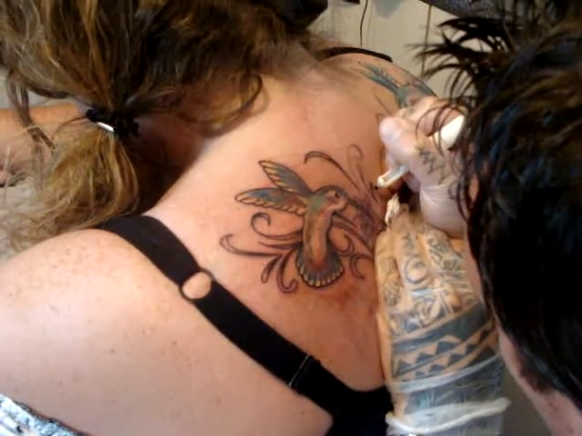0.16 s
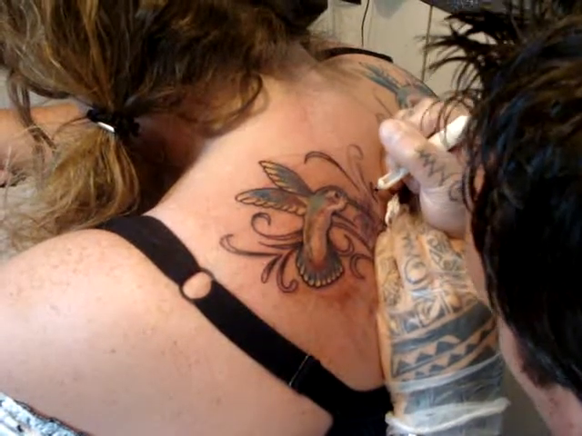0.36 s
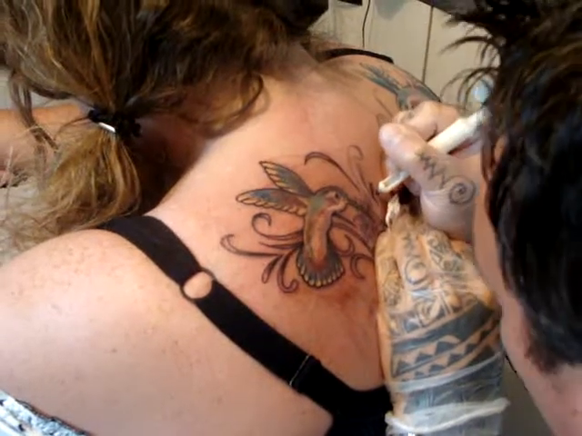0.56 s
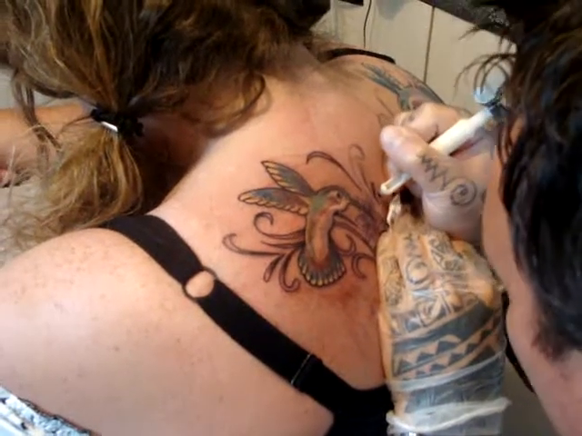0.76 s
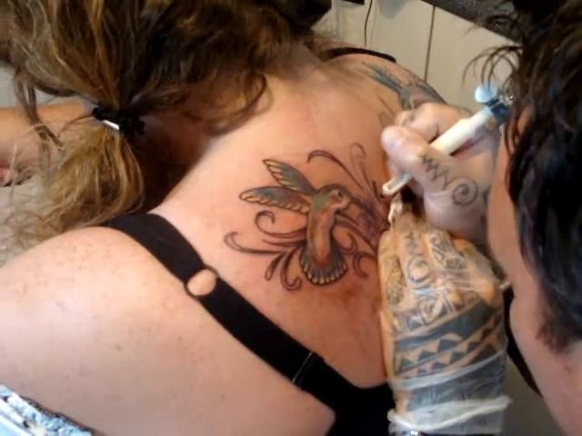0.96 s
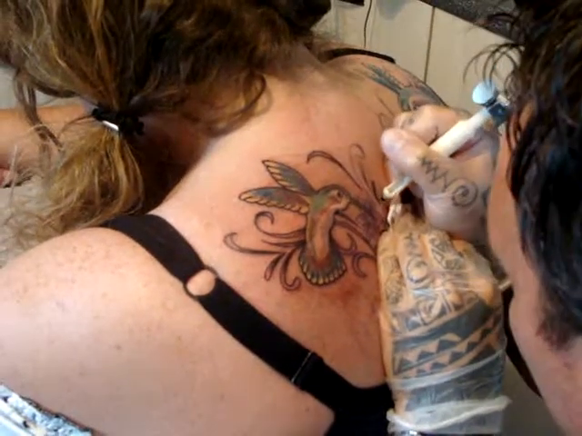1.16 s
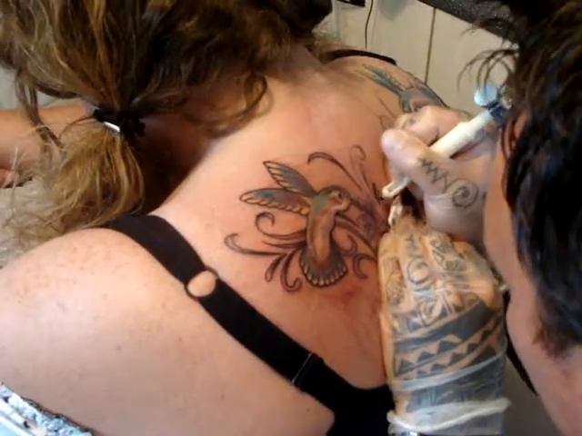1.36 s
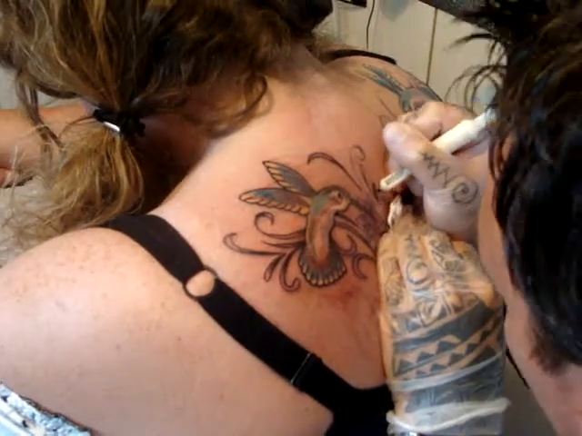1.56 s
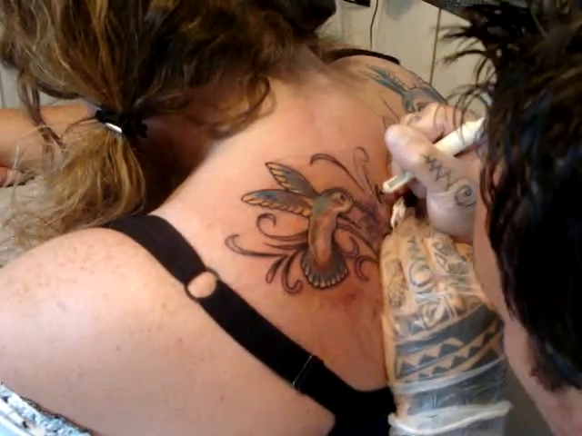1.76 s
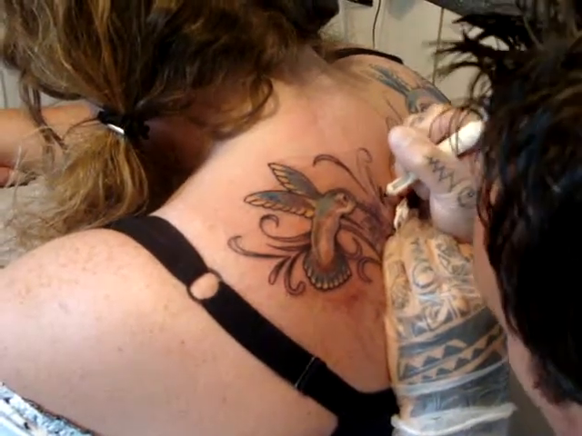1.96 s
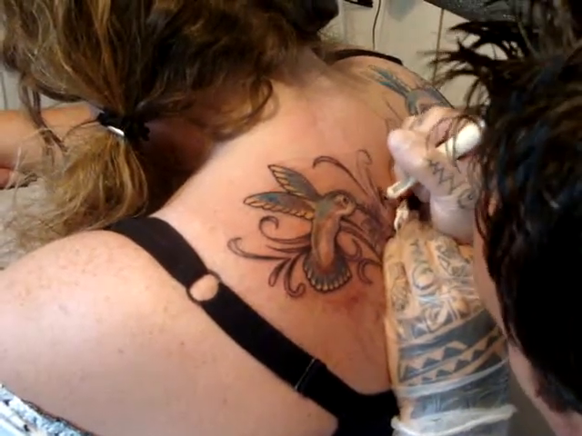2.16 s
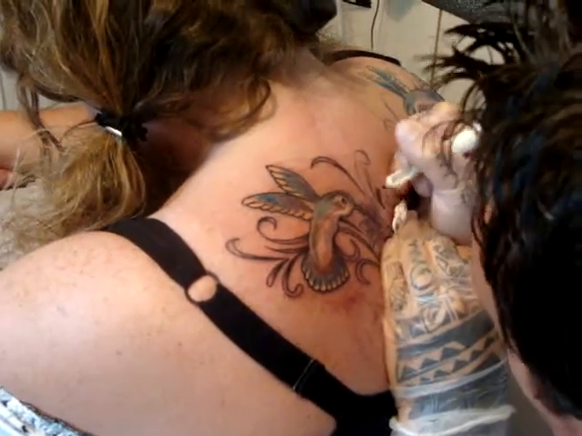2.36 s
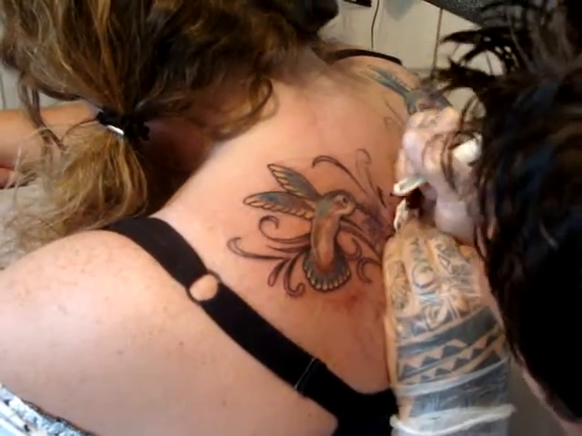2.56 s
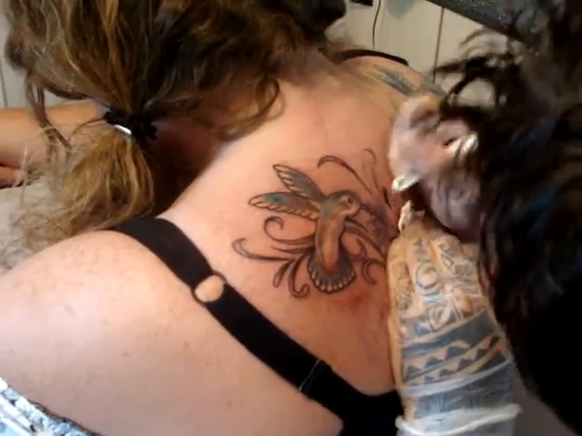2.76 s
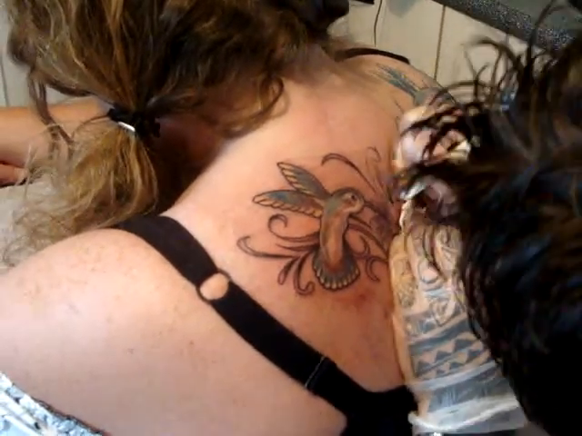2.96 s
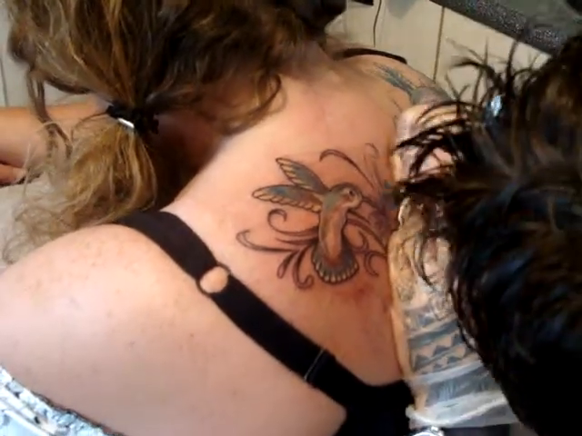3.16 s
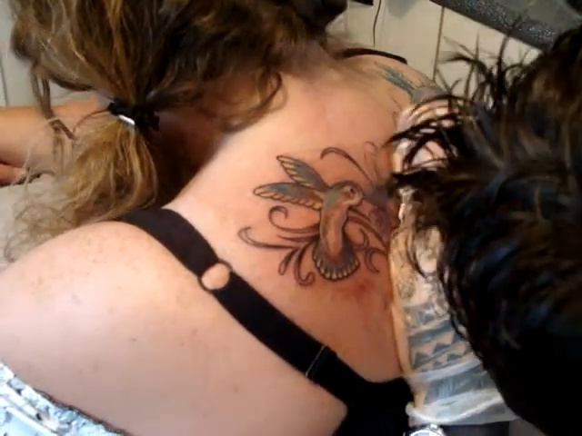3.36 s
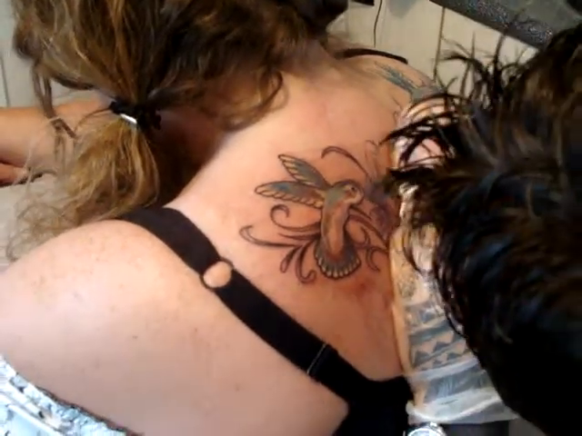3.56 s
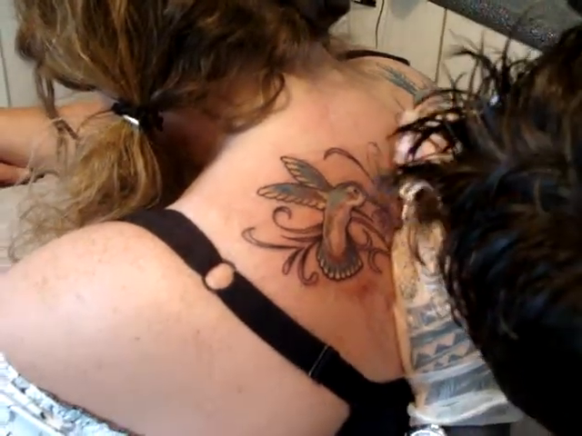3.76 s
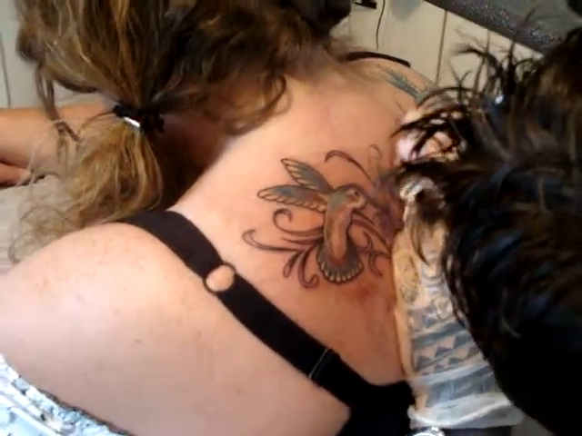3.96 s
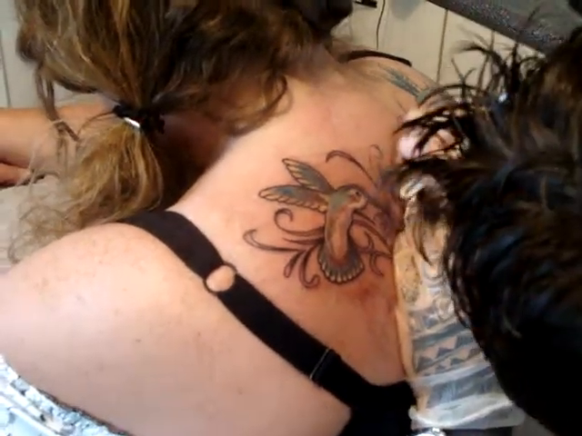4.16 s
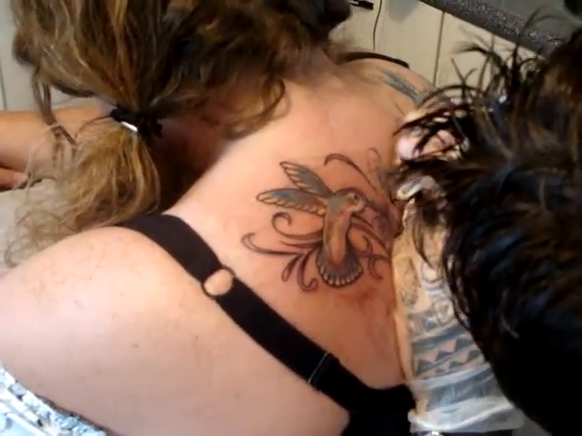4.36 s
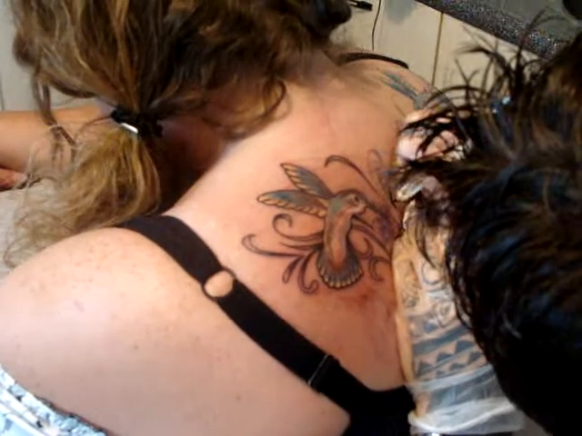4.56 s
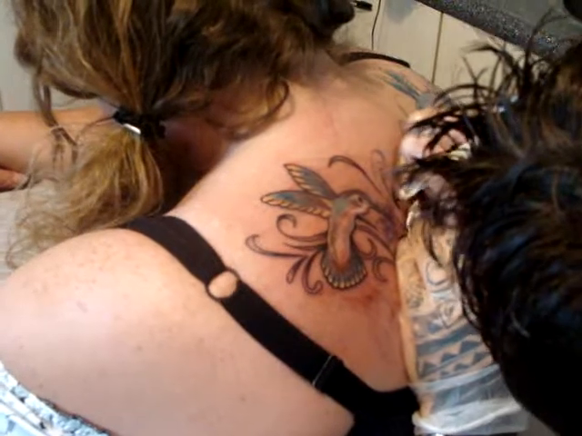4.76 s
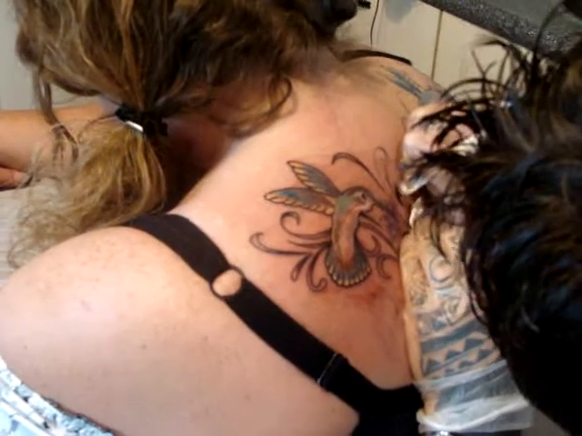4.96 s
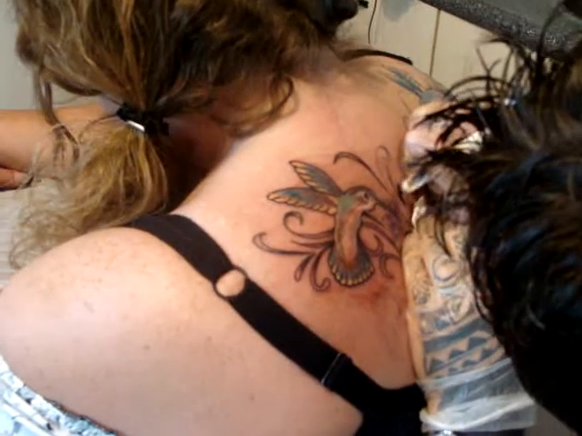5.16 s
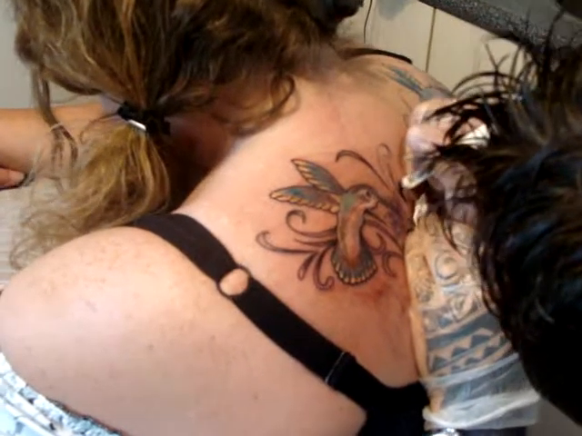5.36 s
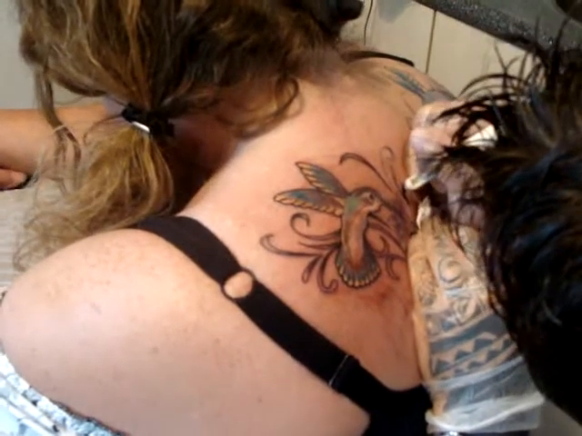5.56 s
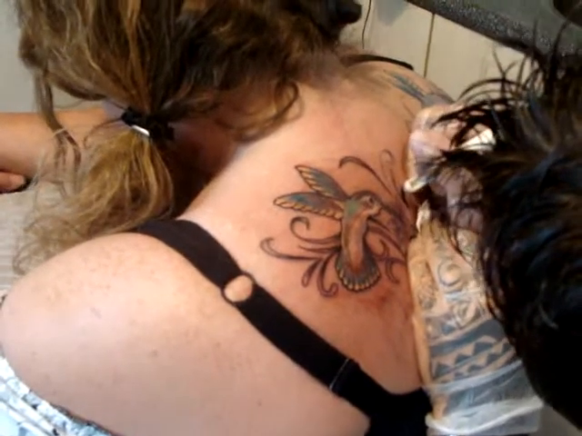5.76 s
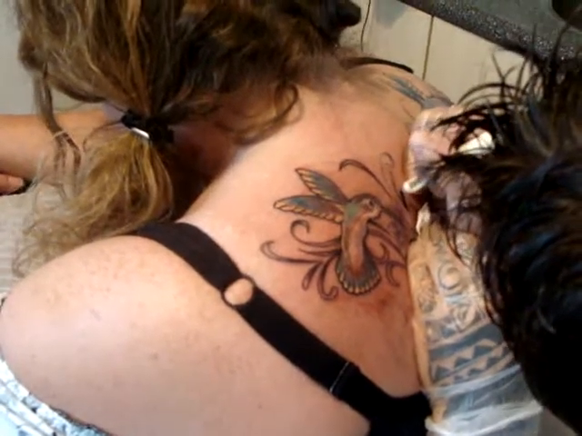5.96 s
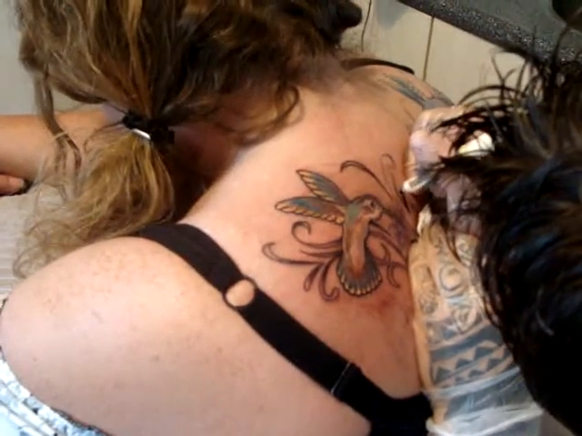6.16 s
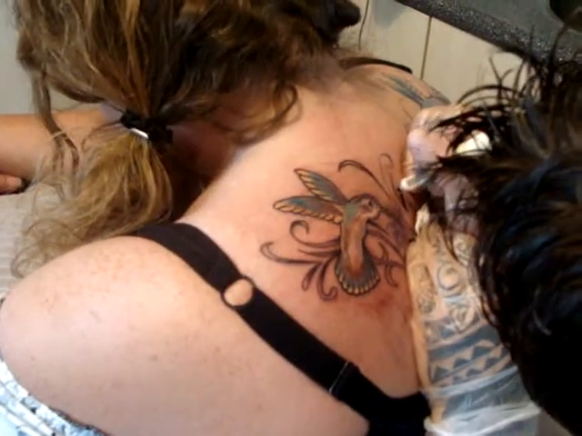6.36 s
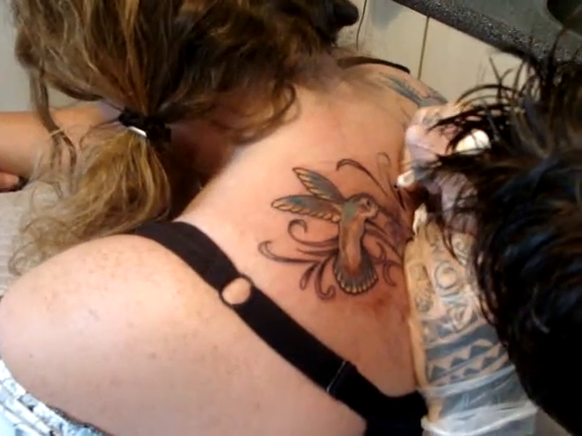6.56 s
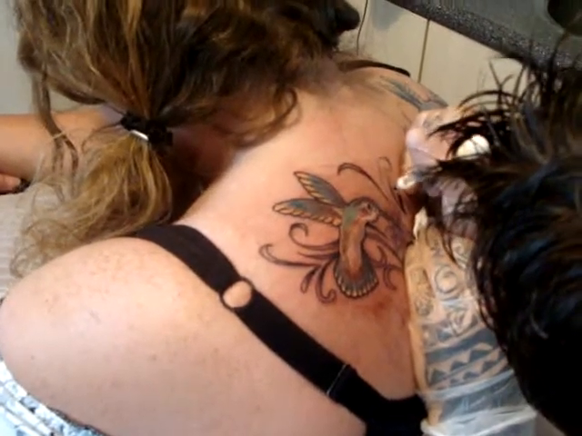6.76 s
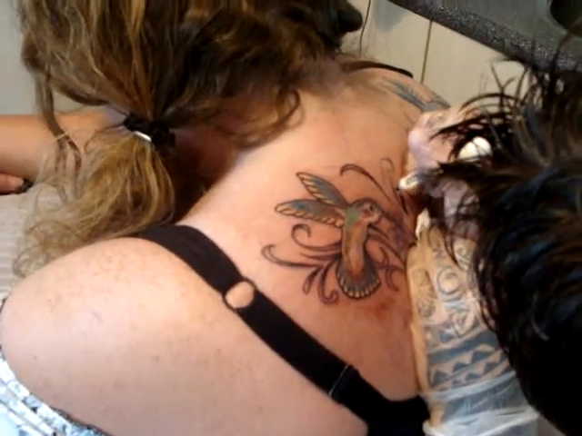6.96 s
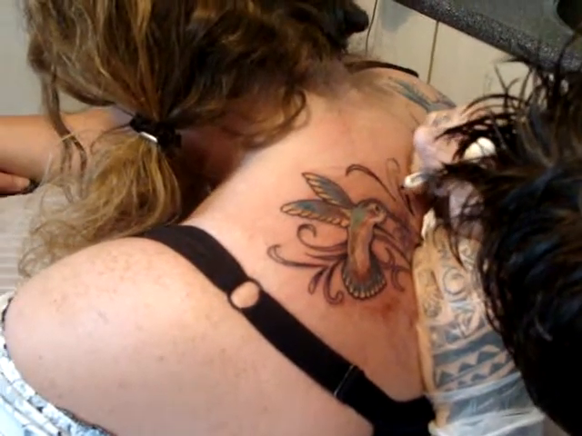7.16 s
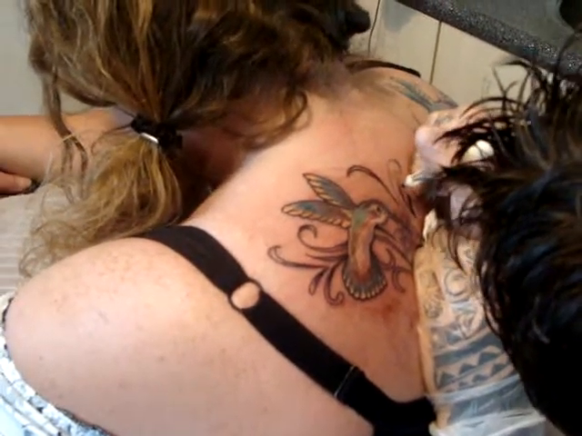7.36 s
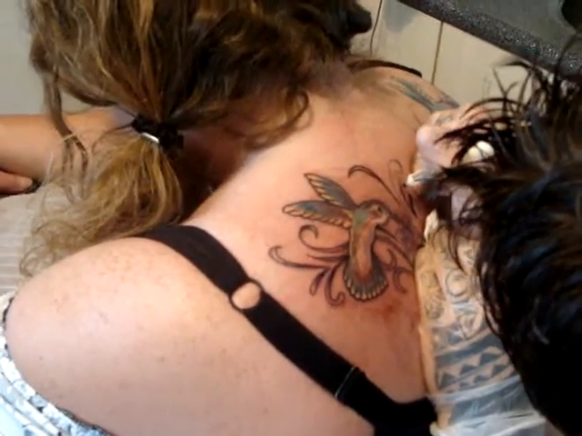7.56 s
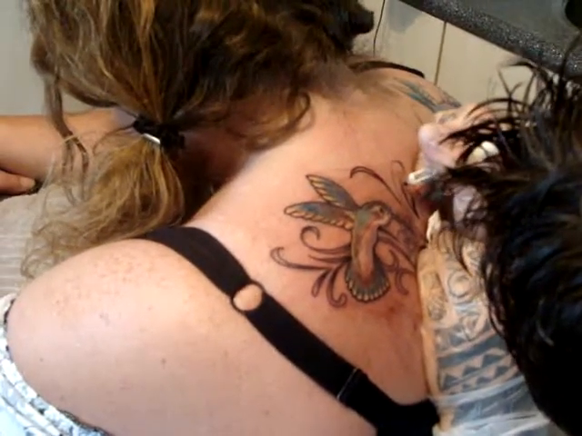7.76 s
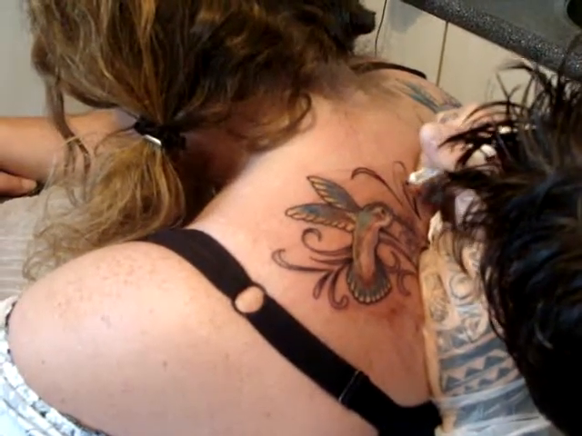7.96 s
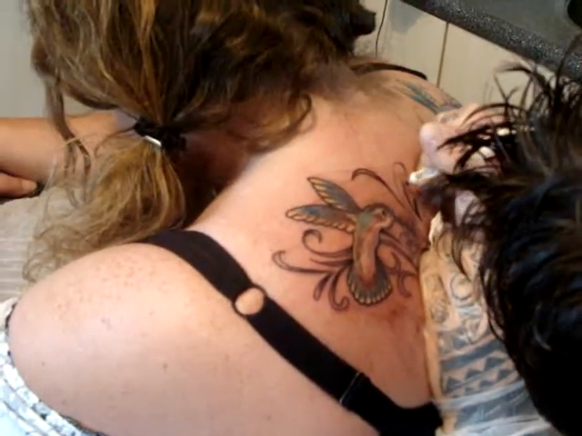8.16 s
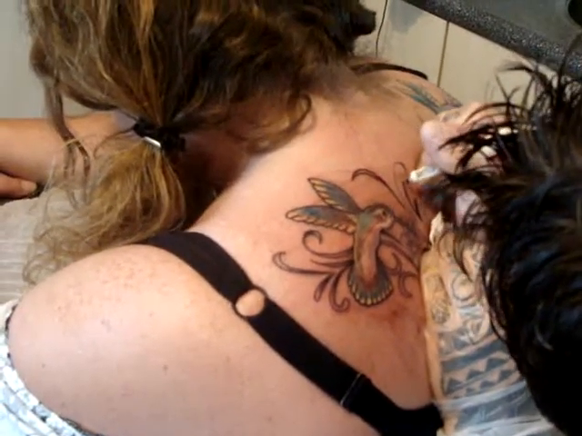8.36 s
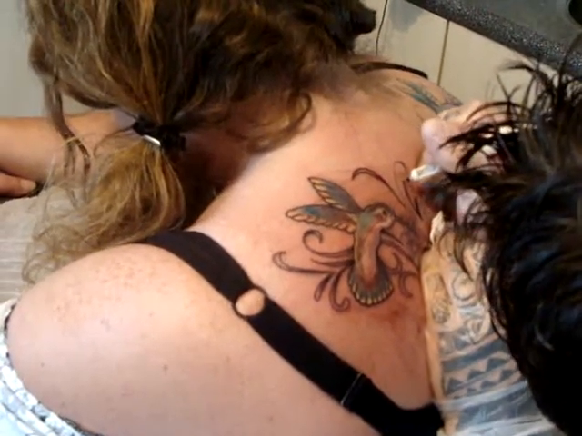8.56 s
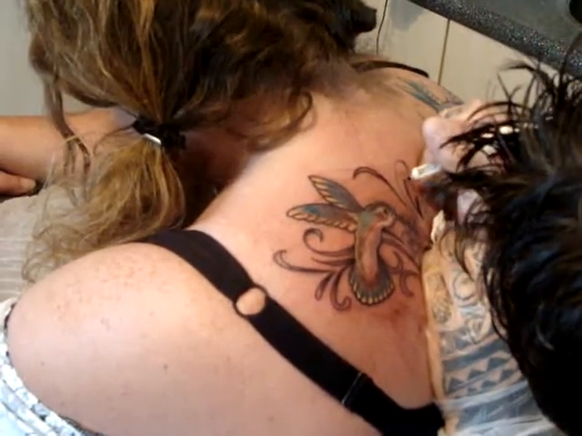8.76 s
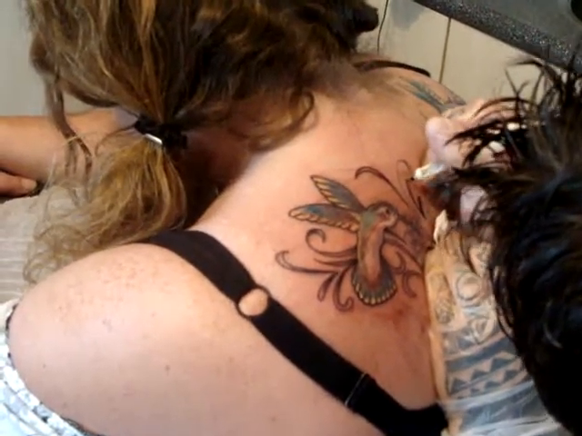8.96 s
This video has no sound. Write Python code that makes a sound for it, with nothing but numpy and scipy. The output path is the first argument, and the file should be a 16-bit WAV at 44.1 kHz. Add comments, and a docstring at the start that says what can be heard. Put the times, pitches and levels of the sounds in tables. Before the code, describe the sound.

In a small studio with a short echo, a nearby tattoo machine gives a bright, rattling buzz as its needle touches skin several times. The buzz cuts out briefly, and the room's air and electrical hum come up in the gap. With a sudden jolt the machine starts again and runs without a break, its tone shifting slightly and growing fuller.

```python
"""A coil tattoo machine buzzes on skin in a small quiet studio, stops for half a second and starts again.
About 113 times a second its armature (a moving iron bar) hits the coils. Each time the frame rings,
the needle bar rattles in its tube and the spring meets its contact. The restart comes with a jolt.
Faint sliding tones and, later, a low drone sit behind the buzz. In the pause the camera's
gain control (automatic volume) lifts the room's air and a low hum."""
import sys
import numpy as np
from scipy import signal
from scipy.fft import rfft, irfft, next_fast_len
from scipy.io import wavfile
from scipy.ndimage import uniform_filter1d, minimum_filter1d, map_coordinates

SR = 44100
rng = np.random.default_rng(int(sys.argv[2]) if len(sys.argv) > 2 else 0)


def digitize_waveform(pressure):
    """Quantize a signal to 16-bit integers and store it at the path in sys.argv[1].

    Rows of a 2-D input are taken as channels; values are limited to [-1, 1].
    """
    field = np.atleast_2d(pressure).T
    bounded = np.clip(field, -1, 1)
    quanta = np.round(bounded * 32767).astype(np.int16)
    wavfile.write(sys.argv[1], SR, quanta)


N = 398223

# When the foot switch is held down. Each row: start in seconds, end in seconds.
SWITCH_ON = [(.0005, 2.466), (3.032, 9.1)]
# The machine is slower while the needle skims the skin, faster once it works steadily.
# Each row: time in seconds, strokes per second.
STROKE_RATE = [(0, 111.1), (1.1, 110.1), (2.2, 111.6), (3.05, 112.6), (3.3, 114.7), (3.9, 114.5),
               (4.05, 112.1), (4.32, 111.4), (4.42, 114.3), (9, 114.2)]
# Short dabs of the needle into the skin. Each row: middle in seconds, length in seconds, pressure 0-1.
DABS = [(1.388, 0.15, 0.44), (1.701, 0.15, 0.47), (1.917, .18, .6), (2.122, .2, .65), (2.407, .26, 0.91),
        (3.054, .2, .5)]
# How loud the heavy parts are as the hand turns.
# Each row: time in seconds, then the relative levels of frame, grip and knock in dB.
HAND_TURN = [(0, -45, -52.5, -74), (.55, -47, -53, -75), (.8, -49, -52, -76), (1.25, -50, -50.5, -56),
             (1.6, -46.5, -52, -57.5), (2.4, -45, -52, -58.5), (3.1, -46, -47.5, -54.5),
             (3.6, -48, -49, -64), (4.3, -49, -55, -66), (4.55, -44, -50.5, -60), (5.45, -43, -52, -59.5),
             (5.65, -41, -51.5, -61.5), (6, -40, -53, -55), (6.6, -41.5, -53.5, -64), (9, -42, -52.5, -55)]
# How the machine is held. Each row: time in seconds, firmness 0-1, needle rattle in dB.
HAND_HOLD = [(0, .05, -8), (1.2, .05, -8), (1.9, .3, -3), (2.4, .5, -1), (3.05, .95, -2), (4.3, .95, -3),
             (5.2, .65, -3), (6.5, .6, -1), (9, .5, 0)]
# Tone of the steel parts, lower when held firmly. Each row: frequency in Hz, relative level in dB.
STEEL_LOOSE = [(4500, -63), (6000, -21), (6800, -18.5), (7300, -4.5), (7800, -14.5), (8400, 0.5), (8750, 4),
               (9150, -6.5), (9600, -3.5), (10200, -14)]
STEEL_FIRM = [(4500, -64.5), (5600, -14.5), (6300, -4), (6900, -6), (7450, -3), (7850, 8), (8300, 7.5),
              (8750, 5.5), (9200, 0.5), (10200, -4.5)]
# Tone of the armature's clack, the grip tube and the whole machine's dull knock.
# Each row: frequency in Hz, relative level in dB.
CLACK_TONE = [(1800, -32.5), (2700, -8.5), (3100, -11), (3330, -3.5), (3550, -3.5), (3800, -6.5),
              (4100, -3), (4500, 1), (4800, 0.5), (5300, -0.5), (5700, -7), (8000, -15)]
GRIP_TONE = [(900, -33.5), (1200, -10), (1400, -7.5), (1580, -1.5), (1770, 2), (1900, -8.5), (2050, -29.5),
             (2400, -21.5), (3000, -34.5)]
KNOCK_TONE = [(110, -36), (240, -20.5), (420, -7.5), (580, -8.5), (700, 3), (820, -2.5), (920, -0.5),
              (1030, -2.5), (1250, -5), (1600, -15), (3000, -47.5)]
# Pitches at which the leaf spring, the bending frame and the grip tube ring.
# Each row: frequency in Hz, width in Hz, relative level in dB.
SPRING_MODES = [(3349, 43, 2), (4004, 60, -1), (4224, 130, -2.5)]
FRAME_MODES = [(2162, 480, 0), (2213, 310, 0)]
GRIP_MODES = [(1370, 300, 4), (1528, 100, -3.5), (1784, 86, 2)]
# The studio's echo. Each row: frequency in Hz, seconds it takes to fade by 60 dB.
ECHO_FADE = [(200, 0.78), (2000, 0.47), (9000, 0.28)]
# Tone of the room's air. Each row: frequency in Hz, relative level in dB.
AIR_TONE = [(25, -30), (55, -10.5), (95, -11.5), (230, -7.5), (400, -8), (560, -2.5), (750, -7),
            (1000, -3.5), (1600, -9.5), (2100, -9.5), (3300, -10), (4500, -18.5), (10000, -25.5)]
# Boomy bands in that air. Each row: frequency in Hz, width in Hz, relative level in dB.
BOOM_MODES = [(320.3, 21, -4.5), (671, 17, -9.5), (785, 30, -5)]
# A falling whine, then a squeak in the pause. Each row: time in seconds, pitch in Hz, level in dB.
WHINE_PATH = [(1.3, 745, -71), (1.55, 735, -60), (1.8, 705, -55), (1.98, 667, -54.5), (2.08, 664.4, -70)]
SQUEAK_PATH = [(2.68, 3300, -73), (2.77, 3235, -60), (2.85, 3250, -67), (2.93, 3360, -70), (3.0, 3330, -76)]
# Tone of the jolt at the restart. Each row: frequency in Hz, relative level in dB.
JOLT_TONE = [(25, -33.5), (90, -14), (300, -14), (600, -6), (1200, -12.5), (3000, -20.5), (9000, -7.5)]
# Something rings along after the restart. Each row: time in seconds, pitch in Hz, level in dB.
RINGING_PATH = [(3.05, 906, -71), (3.25, 933, -56.5), (3.6, 918, -60), (3.9, 920, -64), (4.1, 903, -78)]
# A low drone comes in. Each row: time in seconds, level in dB.
DRONE_LEVEL = [(0, -89), (5.5, -75), (5.8, -66.5), (6.9, -69), (7.4, -73), (8.5, -69), (9, -67)]


def amp(db):
    """Turn decibels into a number to multiply by."""
    return 10 ** (np.asarray(db) / 20)


def unit(x):
    """Scale x to an average (rms) level of 1."""
    return x / np.sqrt(np.mean(x ** 2) + 1e-20)


def value_at(points, hz):
    """Read between (Hz, value) points, with the octaves evenly spaced."""
    freqs, values = np.transpose(points)
    return np.interp(np.log(hz + 1), np.log(freqs + 1), values)


def curves(rows):
    """Turn each column after the time into one value per sample."""
    times, *columns = np.transpose(rows)
    return [np.interp(np.arange(N) / SR, times, column) for column in columns]


def wobble(rate):
    """A smooth curve through `rate` random values a second."""
    return map_coordinates(rng.standard_normal(int(N * rate / SR) + 4), [np.arange(N) * rate / SR])


def filtered(x, response):
    """Multiply each frequency in x by response(hz)."""
    size = 2 * next_fast_len(N // 2 + SR // 4)
    return irfft(rfft(x, size) * response(np.fft.rfftfreq(size, 1 / SR)), size)[..., :N]


def coloured(x, tone):
    """Give x this tone, at level 1; the ringing follows each hit and never leads it."""
    def response(hz):
        cepstrum = irfft(np.log(amp(value_at(tone, hz))))
        return np.exp(rfft(2 * cepstrum[:len(hz) - 1], len(cepstrum)))
    return unit(filtered(x, response))


def resonances(modes, hz):
    """How something that rings at these modes answers each frequency."""
    return sum(amp(db) * 1j * hz * width / (centre ** 2 - hz ** 2 + 1j * hz * width)
               for centre, width, db in modes)


def impacts(times, scatter_s, spread):
    """Sharp clicks, up to scatter_s early or late, their sizes varying by +-spread."""
    late, size = rng.uniform(-1, 1, (len(times), 2)).T
    position = (times + scatter_s * late) * SR
    taps = np.floor(position).astype(int)[:, None] + np.arange(-7, 9)
    offset = taps - position[:, None]
    click = np.sinc(offset) * np.cos(np.pi * offset / 16) ** 2  # can land between samples
    pulses = (1 + spread * size[:, None]) * click
    inside = (taps >= 0) & (taps < N)
    return unit(np.bincount(taps[inside], pulses[inside], N))


def chatter(strokes, delay_s, window_s, count):
    """Several light taps per stroke, back and forth, anywhere within +-window_s."""
    return unit(sum((-1) ** k * impacts(strokes + delay_s, window_s, spread=1) for k in range(count)))


def pressure():
    """Each dab presses the needle in and lets go in one smooth arch."""
    t = np.arange(N) / SR
    return sum(force * np.cos(np.pi * np.clip((t - middle) / length, -.5, .5)) ** 2
               for middle, length, force in DABS)


def part_levels():
    """Each part's level in dB: dabs and the turning hand change the heavy parts most."""
    frame_db, grip_db, knock_db = np.array(curves(HAND_TURN)) + 5 * pressure()
    swing_db = frame_db + 43.5  # how far the frame is above its usual level
    steel_db, clack_db = -26 + .1 * swing_db, -40 + .36 * swing_db
    sway_db = .5 * wobble(22)  # the hand is never quite still
    return np.array([steel_db, clack_db, frame_db, grip_db - 1, knock_db - 1.5]) + sway_db


def stroke_times(loose):
    """When the armature lands, in seconds; pressure hurries it and rattle makes it unsteady."""
    t = np.arange(N) / SR
    rate_hz = curves(STROKE_RATE)[0] + 3.4 * pressure() + .882 * loose ** 2 * wobble(55)
    cycles = np.cumsum(rate_hz) / SR
    landings = [np.arange(*np.interp(run, t, cycles)) for run in SWITCH_ON]
    return np.interp(np.concatenate(landings), cycles, t)


def needle_rattle(strokes):
    """The needle bar chatters in its tube just after each blow and again before the next."""
    after = chatter(strokes, delay_s=.0008, window_s=.000714, count=8)
    before = chatter(strokes, delay_s=.0071, window_s=.0015, count=10)
    return unit(after + 1.5 * before)


def steel_ring(strokes, rattle, loose, firm):
    """Small steel parts ring from the blow's shock, one rebound, the spring's contact and the rattle."""
    shock = impacts(strokes + .0002, scatter_s=.000048, spread=.18)
    rebound = impacts(strokes + .001, scatter_s=.00015, spread=.25)
    # the spring flies back and meets the contact screw two thirds of a cycle later
    contact = impacts(strokes + .006, scatter_s=.00014, spread=1)
    hits = shock + .45 * rebound + .42 * contact + (.28 + .58 * loose) * rattle
    hits /= np.sqrt(1 + loose / 2)
    return unit((1 - firm) * coloured(hits, STEEL_LOOSE) + firm * coloured(hits, STEEL_FIRM))


def armature_clack(strokes, blow, rattle, loose):
    """The armature hits the coils and bounces before it settles."""
    bounce = chatter(strokes, delay_s=.0019, window_s=.001175, count=4)
    hits = blow + loose * (.6 * rattle + .9 * bounce)
    return coloured(hits / np.sqrt(1 + loose ** 2), CLACK_TONE)


def spring_ring(blow, rattle, loose):
    """The leaf spring rings on after each blow and rattle."""
    return unit(filtered(blow + .45 * loose * rattle, lambda hz: resonances(SPRING_MODES, hz)))


def grip_and_knock(strokes, rattle, loose):
    """A moment after each blow, an even push rings the grip tube and knocks the whole machine."""
    push = impacts(strokes + .001, scatter_s=.000025, spread=.14)
    tube = filtered(push + .93 * loose * rattle, lambda hz: resonances(GRIP_MODES, hz))
    return coloured(tube, GRIP_TONE), coloured(push + amp(6.5) * loose * rattle, KNOCK_TONE)


def frame_ring(strokes, rattle, loose):
    """The frame bends in two linked ways; the more the needle rattles, the less evenly it swings."""
    unrest = np.interp(strokes * SR, np.arange(N), loose)
    shake = impacts(strokes + .001377, scatter_s=.000085 * unrest, spread=.059) + .16 * loose * rattle
    first, second = FRAME_MODES[:1], FRAME_MODES[1:]
    return unit(filtered(shake, lambda hz: resonances(first, hz) * resonances(second, hz)))


def machine():
    """Fast, regular blows make a buzz: bright from the light parts, deep from the heavy ones."""
    steel_db, clack_db, frame_db, grip_db, knock_db = part_levels()
    firm, rattle_db = curves(HAND_HOLD)
    loose = amp(rattle_db)  # how freely the needle rattles, up to 1
    strokes = stroke_times(loose)
    blow = impacts(strokes, scatter_s=.00002, spread=.2)
    rattle = needle_rattle(strokes)
    steel = steel_ring(strokes, rattle, loose, firm)
    clack = armature_clack(strokes, blow, rattle, loose)
    spring = spring_ring(blow, rattle, loose)
    grip, knock = grip_and_knock(strokes, rattle, loose)
    frame = frame_ring(strokes, rattle, loose)
    bright = amp(steel_db) * steel + amp(clack_db) * (clack + amp(-8.5) * spring)
    deep = amp(frame_db) * frame + amp(grip_db) * grip + amp(knock_db) * knock
    return bright, deep


def room_echo(x):
    """The studio's short echo starts 4 ms late; high notes die away first."""
    hz, t, noise = signal.stft(rng.standard_normal(SR // 2), SR, nperseg=256)
    fade = amp(-60 * t / value_at(ECHO_FADE, hz)[:, None])
    tail = signal.istft(noise * fade, SR, nperseg=256)[1]
    return signal.fftconvolve(np.pad(x, (SR // 250, 0)), tail / np.linalg.norm(tail))[:N]


def room_air():
    """Moving air makes a soft rush with a few boomy bands."""
    rush = amp(-58 + 1.85 * wobble(2.99)) * coloured(rng.standard_normal(N), AIR_TONE)
    boom_db = -63 + 1.1 * wobble(9)
    boom = unit(filtered(rng.standard_normal(N), lambda hz: resonances(BOOM_MODES, hz)))
    return rush + amp(boom_db) * boom


def electrical_hum(hz=126.5):
    """A low electrical hum at one steady pitch."""
    return amp(-67 + .5 * wobble(2.4)) * np.sin(2 * np.pi * hz * np.arange(N) / SR)


def faint_tone(path, waver):
    """A faint tone that slides in pitch and wavers by the fraction `waver`."""
    hz, db = curves(path)
    t = np.arange(N) / SR
    phase = 2 * np.pi * np.cumsum(hz * (1 + waver * wobble(70))) / SR
    sounding = (t > path[0][0]) & (t < path[-1][0])
    return np.sqrt(2) * amp(db) * np.sin(phase) * sounding


def restart_jolt(fade_s=.2):
    """At the restart, the first pull of the coils jolts the whole machine."""
    age = np.arange(N) / SR - SWITCH_ON[1][0]
    level = (age > 0) * amp(-28 - 60 * np.abs(age) / fade_s)
    return level * coloured(rng.standard_normal(N), JOLT_TONE)


def low_drone():
    """A narrow band of noise around 188 Hz swells in the second half."""
    band = filtered(rng.standard_normal(N), lambda hz: resonances([(188, 37, 0)], hz) ** 2)
    return amp(curves(DRONE_LEVEL)[0]) * unit(band)


def scene():
    """The machine close by, its room, and faint sounds behind it."""
    bright, deep = machine()
    echo = room_echo(amp(-4) * bright + amp(-6) * deep)
    whine = faint_tone(WHINE_PATH, waver=.02)
    squeak = faint_tone(SQUEAK_PATH, waver=.0098)
    ringing = faint_tone(RINGING_PATH, waver=.0017)
    jolt = restart_jolt()
    background = room_air() + low_drone() + electrical_hum()
    return (bright + deep + echo + background + whine + squeak + jolt + ringing)[None]


def gain_control(x, knee_db, recovery_db_per_s, max_lift_db):
    """Sound below knee_db is turned up, more slowly near the limit; loud sound ends the lift at once."""
    power = uniform_filter1d(x ** 2, size=SR // 56, origin=SR // 113)
    level_db = 10 * np.log10(np.abs(power) + 1e-12)
    ramp = recovery_db_per_s * np.arange(N) / SR
    held_db = np.maximum.accumulate(level_db + ramp, axis=-1) - ramp  # jumps up, sinks steadily
    lift_db = -max_lift_db * np.expm1(-np.maximum(knee_db - held_db, 0) / max_lift_db)
    smoothing = SR // 400
    return x * amp(uniform_filter1d(minimum_filter1d(lift_db, size=smoothing), size=smoothing))


def record(dry):
    """The camera turns up quiet moments and cuts off the highest treble."""
    levelled = gain_control(dry, knee_db=-24, recovery_db_per_s=50, max_lift_db=19)
    return filtered(levelled, lambda hz: hz < 10110)


dry = scene()
out = record(dry)
digitize_waveform(out)
```